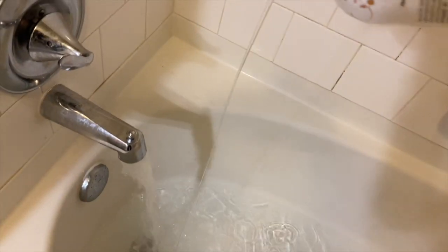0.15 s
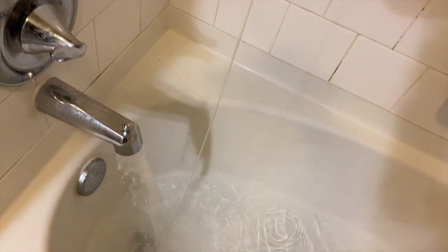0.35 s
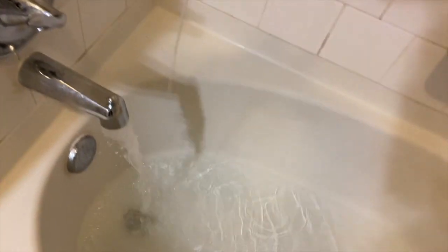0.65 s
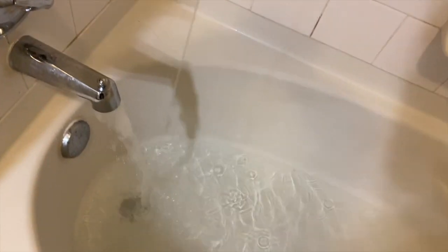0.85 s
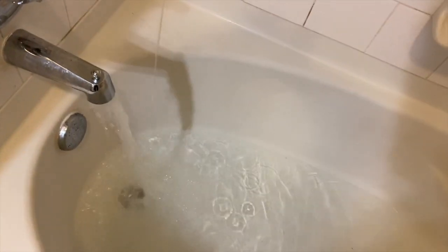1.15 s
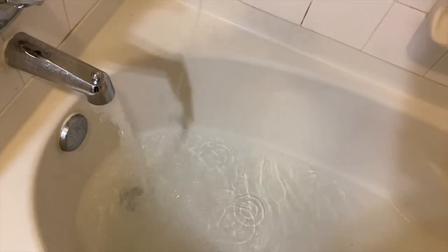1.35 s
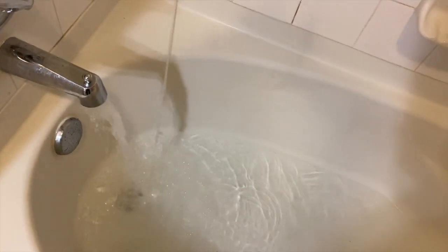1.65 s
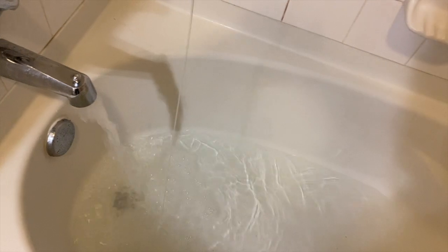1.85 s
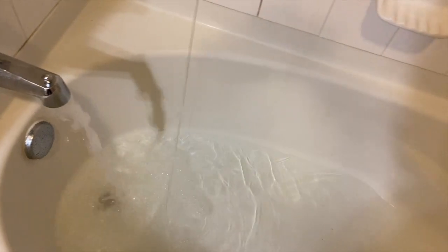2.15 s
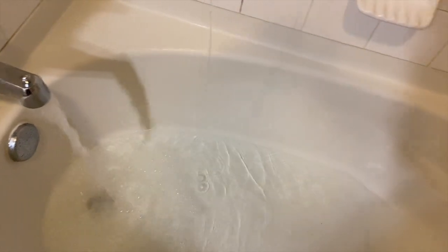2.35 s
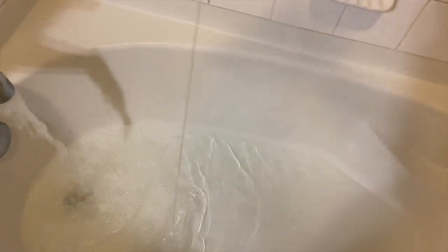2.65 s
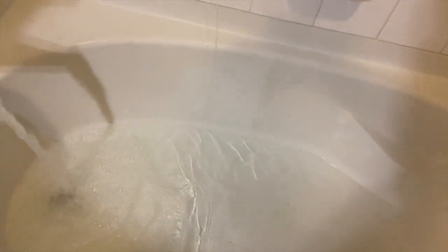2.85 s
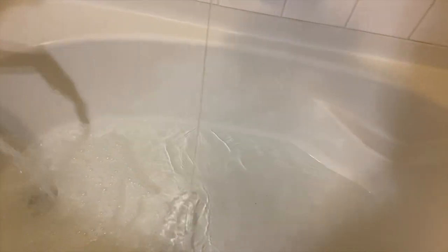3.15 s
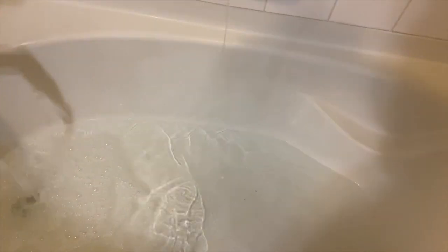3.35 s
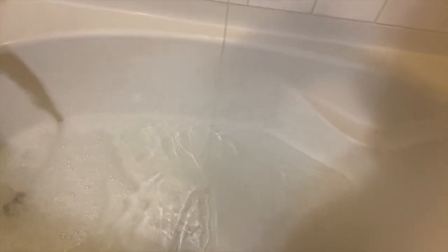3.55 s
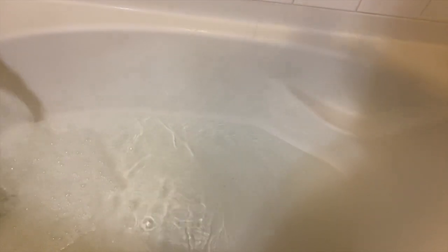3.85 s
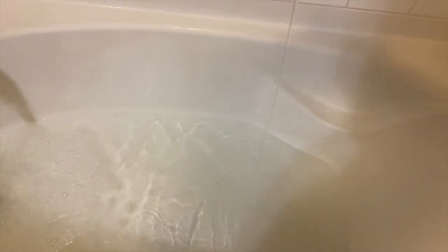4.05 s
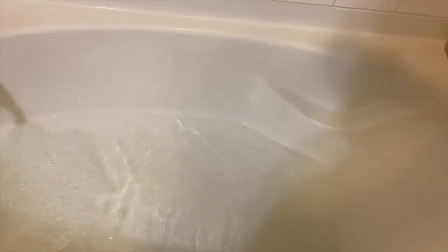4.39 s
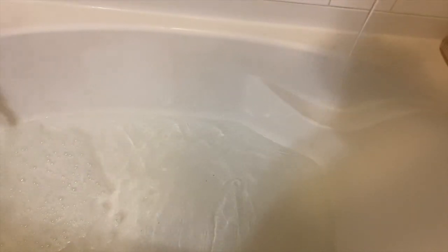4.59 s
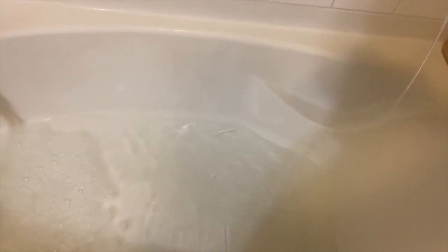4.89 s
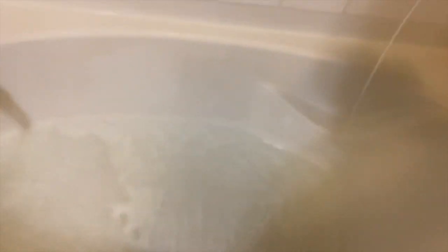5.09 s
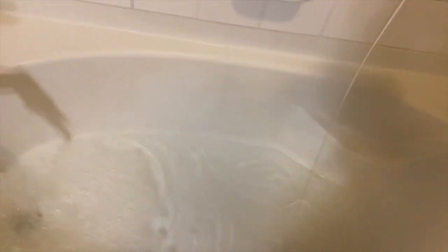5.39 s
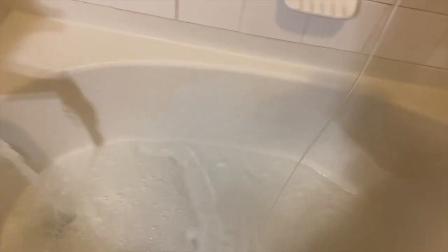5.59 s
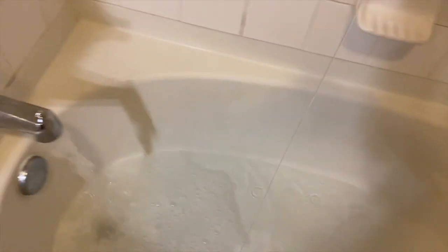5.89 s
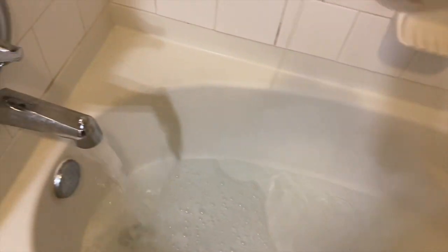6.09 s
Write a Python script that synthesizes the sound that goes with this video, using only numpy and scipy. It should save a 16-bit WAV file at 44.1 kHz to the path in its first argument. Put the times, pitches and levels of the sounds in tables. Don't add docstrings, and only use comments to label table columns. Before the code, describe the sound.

A bathtub faucet pours at full force into a partly filled tub, close to a handheld stereo microphone in a small tiled bathroom with a short, bright tail. The broad rush runs unbroken for about 6.2 seconds, mixing hiss, dense bubbling and low, uneven pounding from the tub. It starts near and loud, with clear hollow plops clustered from 0.1 to 1.5 s and a deep bloop near 0.2 s. From about 0.9 s the rush eases, with a higher bloop at 1.5 s and a faint low one at 2.5 s. Sharp splashes and fine bright droplet ticks scatter throughout, with strong slaps around 3.6 and 4.0 to 4.3 s. The jet swells again near 4.8 s, drops to its softest around 5.7 s after a sharp splash at 5.6, plops again at 5.9, and is still running at the end.

```python
import sys
import numpy as np
from scipy import signal
from scipy.fft import rfft, irfft, next_fast_len
from scipy.io import wavfile
from scipy.ndimage import uniform_filter1d

SR = 44100
rng = np.random.default_rng(int(sys.argv[2]) if len(sys.argv) > 2 else 0)


def gain_from_db(level_db):
    decades = np.asarray(level_db, float) / 20
    return 10 ** decades


def int16_out(signal):
    q = np.round(np.clip(np.atleast_2d(signal).T, -1, 1) * 32767)
    wavfile.write(sys.argv[1], SR, q.astype(np.int16))


N = 274743

# frequency in Hz, likeness from 0 to 1,
# lead of the right port in radians, left minus right level in dB.
PORTS = [(0, .99, 0, -1.5), (250, .86, -.3, -1.2), (560, .52, -.7, .5), (950, .18, -.7, 2),
         (1400, .45, 3.1, .3), (1800, .5, 3.9, 2), (2150, .27, 4.6, 2.5), (2600, .62, 6.1, 2.5),
         (3400, .4, 6, 2), (4700, .58, 6, 2), (5400, .23, 6.3, 1.5), (5900, .28, 7.2, 1),
         (6500, .55, 6.1, .6)]


def evened(x):
    return x / np.sqrt(np.mean(x ** 2) + 1e-20)


def read(points, hz):
    f, value = np.transpose(points)
    return np.interp(np.log(hz + 1), np.log(f + 1), value)


def add(mix, s, sound):
    part = mix[round(s * SR):][:len(sound)]
    part += sound[:len(part)]


def standing(x):
    # frequency in Hz, ripple depth in dB.
    depth_db = [(300, 1.5), (800, 6), (2500, 6), (6000, 2.3)]
    hz = np.fft.rfftfreq(N, 1 / SR)
    ripple = rng.standard_normal((2, len(hz)))
    ripple = evened(uniform_filter1d(uniform_filter1d(ripple, size=80), size=80))
    room = gain_from_db(read(depth_db, hz) * np.tanh(ripple))
    rumble_cut = np.sqrt(1 + (42 / (hz + 1)) ** 6)
    return irfft(rfft(x) * room / rumble_cut, N)


def tiles(x, wet_db):
    # frequency in Hz, 60 dB decay time in seconds.
    decay_s = [(200, 0.12), (1000, 0.22), (4000, 0.11), (12000, 0.066)]
    hz, _, z = signal.stft(x, SR, nperseg=256, noverlap=192)
    keep = gain_from_db(-120 * 64 / SR / read(decay_s, hz))
    trail = np.array([signal.lfilter([0, 1 - k], [1, -k], p) for k, p in zip(keep, abs(z) ** 2)])
    hiss = signal.stft(rng.standard_normal((2, N)), SR, nperseg=256, noverlap=192)[2]
    diffuse = evened(abs(hiss)) * np.exp(1j * np.angle(hiss))
    tails = signal.istft(diffuse * np.sqrt(trail), SR, nperseg=256, noverlap=192)[1]
    tails = evened(tails[:, :N]) * np.std(x)
    near = (x + gain_from_db(wet_db) * tails[0]) / np.sqrt(1 + gain_from_db(2 * wet_db))
    return np.array([near, tails[1]])


def surges(t, rows, rest_db):
    rise, fall = 0.28, 0.53
    depth = 1.325
    s, db, length = np.transpose(rows)[:, :, None]
    late = (t - s) / length + (fall - rise) / 2
    bells = gain_from_db(2 * db) * np.exp(-.5 * (late / np.where(late < 0, rise, fall)) ** 2)
    return depth * 10 * np.log10(gain_from_db(2 * rest_db) + bells.sum(0))


def swings(t):
    # time in seconds, level in dB.
    flow = [(0, 2), (.9, -2.2), (1.6, -1), (2.3, -2.5), (2.8, -3), (3.5, -1.8), (4.0, -3), (4.8, 0.5),
            (5.1, -2), (5.7, -4), (6.23, -2.3)]
    # time in seconds, peak in dB, length in seconds.
    pounds = [(.07, -35.5, 0.041), (0.204, -30.5, 0.091), (.4, -29, 0.039), (0.656, -32, 0.056),
              (.75, -33.5, 0.048), (1.076, -35, .07), (1.354, -31, 0.065), (1.535, -24, 0.06),
              (1.76, -33, .05), (2.022, -26.5, 0.07), (2.128, -28.5, .05), (2.188, -29, 0.032),
              (2.562, -29.5, 0.098), (2.75, -33, .1), (2.934, -36, 0.089), (3.145, -37, 0.12),
              (3.334, -38, 0.11), (3.468, -33, 0.059), (3.931, -33, 0.062), (4.24, -28, 0.079),
              (4.352, -33, 0.055), (4.47, -33, .055), (4.688, -34.5, 0.083), (4.964, -24.5, 0.065),
              (5.186, -34, .04), (5.266, -33.5, 0.074), (5.565, -32, 0.058), (5.726, -32.5, .04),
              (5.878, -32, 0.14), (6.172, -26, 0.045)]
    # time in seconds, peak in dB, length in seconds.
    drums = [(0.306, -32.5, 0.065), (0.409, -30.5, 0.063), (0.702, -33, 0.072), (0.867, -25.5, 0.087),
             (1.07, -27, 0.047), (1.353, -33, 0.042), (1.556, -31, 0.138), (1.842, -42, 0.052),
             (2.223, -30.5, 0.032), (2.28, -33, 0.028), (2.57, -21.5, 0.074), (2.774, -32, 0.25),
             (2.991, -26.5, 0.067), (3.095, -30.5, 0.087), (3.215, -30.5, 0.12), (3.752, -35.9, 0.039),
             (3.98, -31.5, 0.12), (4.123, -26, 0.037), (4.23, -26, 0.037), (4.285, -19, 0.011),
             (4.363, -30, 0.058), (4.5, -29, 0.059), (4.82, -28.5, 0.087), (5.167, -33.5, 0.143),
             (5.415, -29.5, 0.13), (5.787, -25.5, 0.059), (5.968, -36, 0.038), (6.05, -39, 0.095)]
    # time in seconds, peak in dB, length in seconds.
    gulps = [(0.033, -27.5, 0.049), (0.35, -31.5, 0.064), (0.584, -25, 0.037), (0.75, -25.5, 0.14),
             (0.955, -26.5, 0.096), (1.2, -27, 0.14), (1.48, -30, 0.2), (2.128, -25, 0.037),
             (2.512, -29.5, 0.066), (2.698, -29, 0.028), (2.982, -27, 0.051), (3.143, -28, 0.042),
             (3.453, -30, 0.056), (3.65, -36, 0.037), (3.814, -25.5, 0.049), (4.82, -32.6, 0.091),
             (5.226, -32.9, 0.069), (5.4, -25.5, 0.045), (5.707, -28.5, 0.083), (6.022, -47, 0.122)]
    churn = surges(t, gulps, rest_db=-33) + np.interp(t, *np.transpose(flow))
    slow_hz = np.geomspace(2, 14, num=16)
    wander = evened(sum(np.sin(2 * np.pi * (f * t + rng.random())) for f in slow_hz))
    spray = 0.5 * churn + 1.57 * wander
    parts = surges(t, pounds, rest_db=-42.5), surges(t, drums, rest_db=-39.5), churn, spray
    return [c - 10 * np.log10(np.mean(gain_from_db(2 * c))) for c in parts]


def resonate(x, hz, width, rate):
    turn = np.exp(2j * np.pi * hz * np.arange(x.shape[-1]) / rate)
    r = np.exp(-np.pi * width / rate)
    once = signal.lfilter([1 - r], [1, -r], x / turn)
    return turn * signal.lfilter([1 - r], [1, -r], once)


def tub():
    # frequency in Hz, width in Hz, level in dB rms,
    # share of wall drumming against floor pounding from 0 to 1, how far it follows from 0 to 1.
    modes = [(56.5, 7.3, -40, 0, 0.14), (91.5, 4.2, -43.5, 0.1, 0.3), (141.5, 11.2, -33, 0.1, 0.79),
             (192, 9.2, -53.5, 0.6, 0.07), (199, 23, -48.5, 0.03, 0.48), (246.4, 8, -39, 0.81, 0.55),
             (274, 13, -53.5, 0, 1), (303.2, 25.6, -36, 0.73, 0.61), (343, 14.5, -46.5, 0, 0),
             (413, 49, -42, .7, 0.4), (528.8, 15.5, -50.5, 0, 0), (544, 20, -48, 0.6, 0.47),
             (663, 10, -53.5, 0.6, 0.95)]
    step = 16
    t = np.arange(N // step + 1) * step / SR
    floor, wall = swings(t)[:2]
    out = np.zeros((2, len(t)))
    for hz, width, db, share, follow in modes:
        ring = resonate(rng.standard_normal(out.shape), hz, 1.22 * width, SR / step)
        size = np.sqrt(uniform_filter1d(abs(ring) ** 2, size=90))
        steady = evened(ring.real / size ** (1.05 * np.clip(follow, 0, 1)))
        force_db = share * wall + (1 - share) * floor
        out += gain_from_db(db + follow * force_db) * steady
    return signal.resample_poly(out, step, 1, axis=1)[:, :N]


def bubble(hz, cycles, rise):
    u = np.arange(int(2.8 * cycles * SR / hz)) * hz / SR / cycles
    envelope = (1 - np.exp(-4.5 * u)) * np.exp(-2.6 * u)
    return envelope * np.sin(2 * np.pi * cycles * (u + rise * u ** 2 / 2))


def glugs():
    # start in seconds, peak in dB, starting pitch in Hz.
    pockets = [
        (.185, -21, 140),
        (1.5, -22, 230),
        (2.52, -26, 130),
    ]
    out = np.zeros(N)
    for s, db, hz in pockets:
        add(out, s, gain_from_db(db) * bubble(hz, cycles=4, rise=-.3))
    return out


def ticks():
    # start in seconds, peak in dB.
    droplets = [(.0747, -27), (.1116, -14.5), (.3511, -19), (.4873, -34), (.608, -19), (.6948, -16),
                (.9073, -14), (1.3405, -19), (1.8806, -18), (2.5037, -19), (2.6, -19), (3.0031, -19),
                (3.239, -22), (3.5857, -18), (3.71, -20), (3.9863, -18), (4.055, -13), (4.2542, -30),
                (4.4573, -15), (5.009, -22), (5.3163, -23), (5.371, -14), (5.5638, -14), (5.9943, -23),
                (6.0696, -21), (6.121, -15), (6.1998, -27)]
    out, t = np.zeros(N), np.arange(1300) / SR
    bright = signal.butter(2, 8500, "highpass", fs=SR, output="sos")
    for (s, db), hiss in zip(droplets, rng.standard_normal((len(droplets), len(t)))):
        envelope = gain_from_db(db - 6.5 - 60 * t / 0.057) * (1 - np.exp(-t / 0.005))
        add(out, s, envelope * evened(signal.sosfilt(bright, hiss)))
    return out


def splashes():
    # start in seconds, peak in dB, treble against the whole in dB.
    slaps = [(.112, -16, 3), (.3606, -8.5, -4), (0.468, -13, 4), (.57, -14, -20), (.7372, -11, 5),
             (.8023, -11, 2), (0.982, -10, -20), (1.246, -23, -11), (1.832, -9, -17), (1.933, -10, 3),
             (2.503, -11, -4), (3.0042, -15, -33), (3.1672, -10, -41), (3.459, -22, -45), (3.5828, -8, -25),
             (3.616, -10, -11), (3.79, -14, -39), (3.8761, -10, -13), (3.9863, -10, 2), (4.2542, -9, -18),
             (4.3806, -12, -13), (4.7303, -10, -13), (4.8623, -9, -25), (5.1516, -37, -13),
             (5.2674, -13, -5), (5.3717, -15, -17), (5.563, -7.5, -11), (5.7756, -13, -17),
             (6.0661, -12, -16), (6.192, -10, -29)]
    out, t = np.zeros(N), np.arange(2600) / SR
    dull = signal.butter(2, [3500, 9000], "bandpass", fs=SR, output="sos")
    bright = signal.butter(2, 9500, "highpass", fs=SR, output="sos")
    for (s, db, treble_db), hiss in zip(slaps, rng.standard_normal((len(slaps), len(t)))):
        body = evened(signal.sosfilt(dull, hiss))
        treble = gain_from_db(treble_db - 19) * evened(signal.sosfilt(bright, hiss))
        envelope = gain_from_db(db - 18.5 - 60 * t / 0.09) * (1 - np.exp(-t / 0.002))
        add(out, s, envelope * (body + treble))
    return out


def plops():
    # start in seconds, peak of the main ring in dB,
    # its pitch in Hz.
    pockets = [(.112, -13, 2550), (.3167, -8, 2380), (.4728, -13, 3600), (.7384, -7.5, 2960),
               (.762, -10, 3640), (.8, -21, 3250), (0.865, -18, 1300), (.9113, -8.5, 1895),
               (.9373, -17, 1910), (1.0021, -9.5, 2000), (1.053, -16, 1155), (1.423, -13.5, 2440),
               (1.4473, -13, 2430), (1.33, -13.5, 2900), (1.935, -15, 5730), (2.7188, -12, 1917),
               (2.723, -28, 1480), (2.9632, -16.5, 1160), (3.143, -11, 1473), (3.43, -14, 1490),
               (3.6296, -14.5, 2480), (3.824, -16.5, 1173), (3.9364, -13, 3420), (4.7316, -16.5, 4000),
               (5.1497, -15, 5160), (5.2305, -15, 1800), (5.2693, -16, 3240), (5.52, -19, 1096),
               (5.901, -10.5, 1496), (5.998, -15, 1306)]
    out = np.zeros(N)
    for (s, db, hz), draw in zip(pockets, rng.random((len(pockets), 5, 4))):
        for k, (cycles, rise, detune, lag) in enumerate(draw):
            pitch = hz * (1 + 0.2 * (detune - .5) * min(k, 1))
            ring = bubble(pitch, (9 + 6 * cycles) * (2000 / hz) ** 0.82, 0.048 + 0.036 * rise)
            add(out, s + k * (.002 + 0.009 * lag), gain_from_db(db - 4.1 * k) * ring)
    return out


def cloud(pitches, per_s, spread_db, cycles, gusts):
    out = np.zeros(N)
    size = gain_from_db(spread_db * np.minimum(rng.exponential(1, N), 4))
    size *= rng.random(N) < per_s * gusts / SR
    kind = np.searchsorted(np.cumsum(pitches) / pitches.sum(), rng.random(N))
    for k, hz in enumerate(pitches):
        grain = bubble(hz, cycles * rng.uniform(0.45, 1.89), rng.uniform(0, 0.088))
        out += signal.oaconvolve(size * (kind == k), grain / np.linalg.norm(grain))[:N]
    return evened(out)


def rush():
    # frequency in Hz, level in dB per Hz.
    wash = [(30, -49), (60, 4), (225, -4.5), (350, -4.5), (520, -4.5), (800, -4.5), (1100, -5.5),
            (1400, 0.0), (2000, -5.5), (2600, -7.5), (3400, -11.5), (4700, -12.0), (6500, -14), (9000, -16),
            (12000, -19), (15500, -23.5)]
    gusts = uniform_filter1d(uniform_filter1d(rng.standard_normal(N), 500), 300)
    gusts = gain_from_db(3.5 * evened(gusts))
    foam = cloud(np.geomspace(400, 6500, 16), 3500, 3.44, 6.05, gusts)
    spray = cloud(np.geomspace(5000, 16500, 10), 3000, 8.4, 3.66, gusts ** 1.5)
    gurgle = cloud(np.geomspace(700, 4500, 14), 320, 3.0, 25.2, gusts)
    water = 0.83 * rng.standard_normal(N) + 0.33 * gurgle + 0.48 * foam + 0.48 * spray
    hz, t, z = signal.stft(water, SR, nperseg=512, noverlap=384)
    z = z / np.sqrt(uniform_filter1d((abs(z) ** 2).mean(1), 7))[:, None]
    patches = rng.standard_normal(z.shape[::-1]).T
    patches = evened(uniform_filter1d(uniform_filter1d(patches, 7, 0), 16, 1))
    _, wall, churn, fizz = swings(t)
    high = np.clip(np.log(hz / 3000 + 1e-9) / 0.18, 0, 1)[:, None]
    low = np.clip(np.log(600 / (hz + 1)) / 0.78, 0, 1)[:, None]
    level_db = high * fizz + (1 - high - low) * churn + 0.3 * low * wall
    z = z * gain_from_db(read(wash, hz)[:, None] + 0.36 * level_db + 0.54 * patches)
    return gain_from_db(-29) * evened(signal.istft(z, SR, nperseg=512, noverlap=384)[1][:N])


def scene():
    water = rush() + plops() + splashes() + ticks()
    return standing(tiles(water, wet_db=-3.0)) + tub() + glugs()


def thin_treble(ports):
    # frequency in Hz, gap in dB that drops the weaker.
    thinning = [(6500, 9), (7300, 6.5), (8300, 3.8), (13500, 3.6), (14800, 1.5)]
    sharp_s = [1.34, 6.065, 6.13]
    sum_difference = [ports[0] + ports[1], ports[0] - ports[1]]
    hz, t, z = signal.stft(sum_difference, SR, nperseg=1024, noverlap=768)
    power = uniform_filter1d(abs(z[:, :512]) ** 2, size=12, axis=2)[:, :, ::4]
    power = power.reshape(2, 64, 8, -1).sum(2)
    waver_db = 1.6 * evened(uniform_filter1d(rng.standard_normal(power.shape[1:]), size=3))
    lead_db = 10 * np.log10(power / power[::-1] + 1e-12)
    margin_db = np.maximum(read(thinning, hz[4:512:8])[:, None] + waver_db, .5)
    boost = np.sqrt(power.sum(0) / power)
    gain = np.where(lead_db < -margin_db, 0, np.where(lead_db > margin_db, boost, 1))
    gain = np.repeat(np.repeat(gain, 8, axis=1), 4, axis=2)[:, :, :len(t)]
    spared = (hz[:512, None] < PORTS[-1][0]) | (abs(t - np.c_[sharp_s]).min(0) < .014)
    z[:, :512] *= np.where(spared, 1, gain)
    mid, side = signal.istft(z, SR, nperseg=1024, noverlap=768)[1][:, :N] / 2
    return np.array([mid + side, mid - side])


def top_cut(x):
    return signal.sosfilt(signal.butter(12, 16970, fs=SR, output="sos"), x)


def record(dry):
    split_hz, lag = 7400, 10.45
    in_step_hz = 6900
    size = next_fast_len(N)
    hz = np.fft.rfftfreq(size, 1 / SR)
    a, b = rfft(dry, size)
    f, *columns = np.transpose(PORTS)
    same, lead, balance_db = (np.interp(hz, f, c) for c in columns)
    treble = np.clip((hz - f[-1]) / (split_hz - f[-1]), 0, 1)
    same = np.clip(same + (0.8 - same) * treble, 0, 1)
    lead = lead + treble * (2 * np.pi * (1 + (hz - in_step_hz) * lag / SR) - lead)
    tilt = gain_from_db(balance_db * (1 - treble) / 2)
    right = same * np.exp(1j * lead) * a + np.sqrt(1 - same ** 2) * b
    band = hz < 15730
    ports = irfft(np.array([a * tilt, right / tilt]) * band, size)[:, :N]
    return top_cut(thin_treble(ports))


dry = scene()
out = record(dry)
int16_out(out)
```